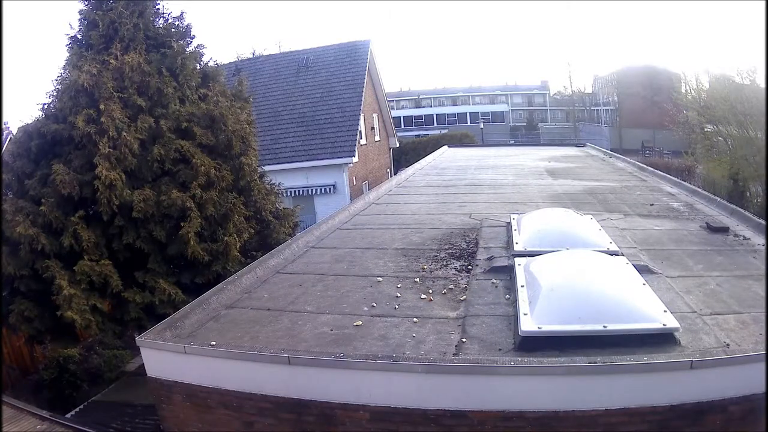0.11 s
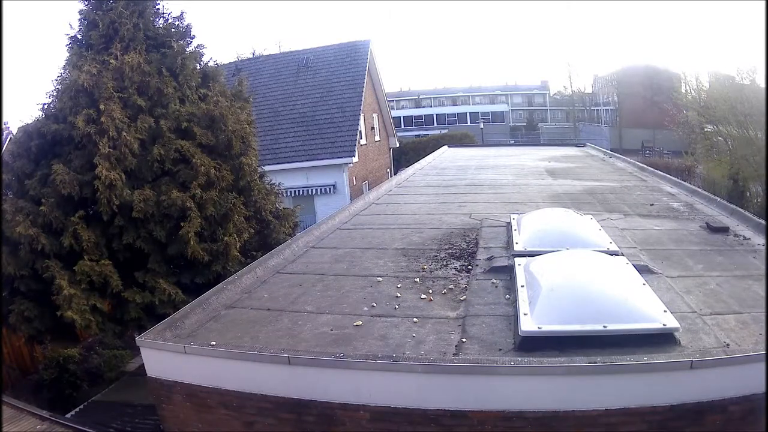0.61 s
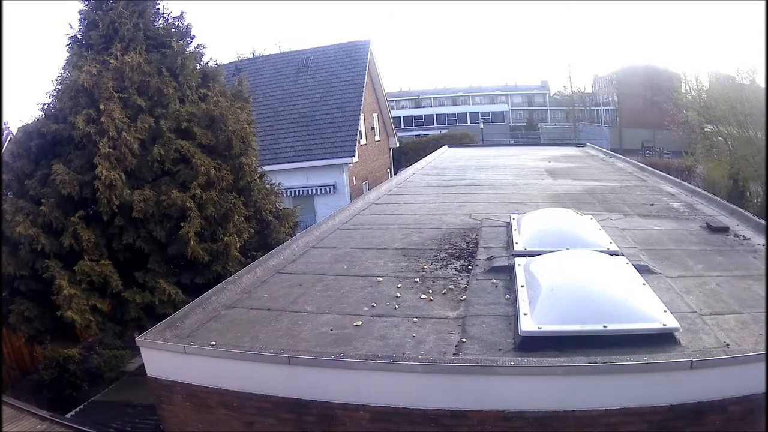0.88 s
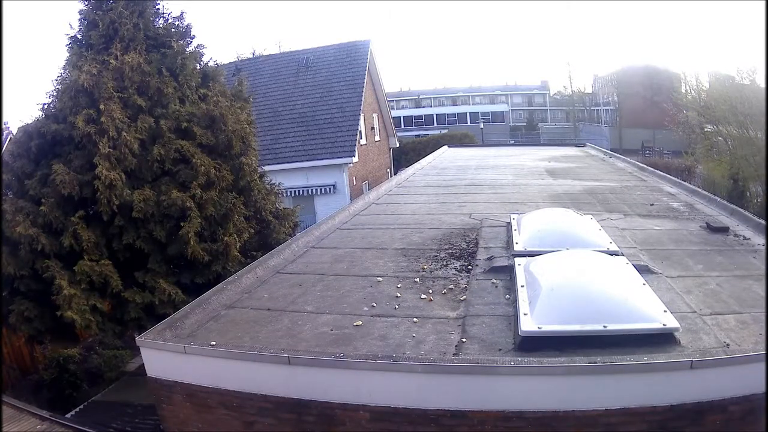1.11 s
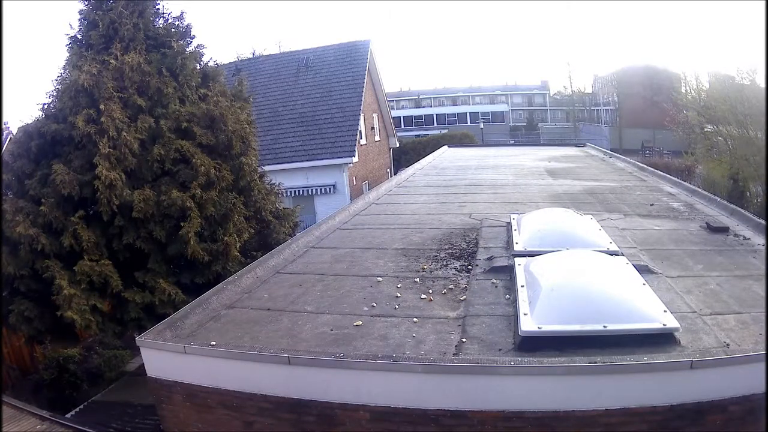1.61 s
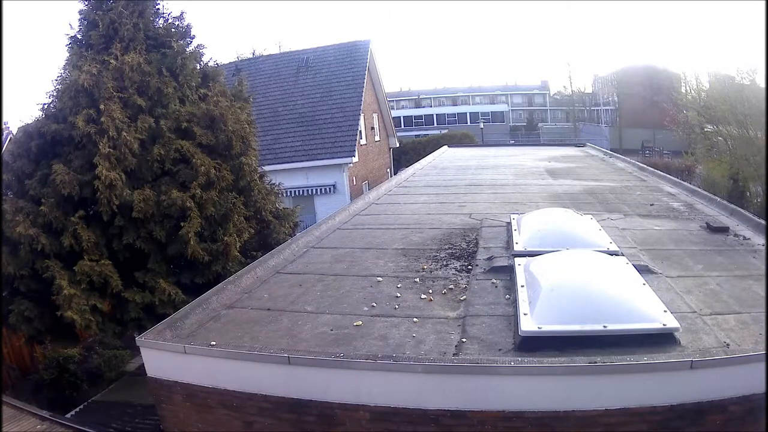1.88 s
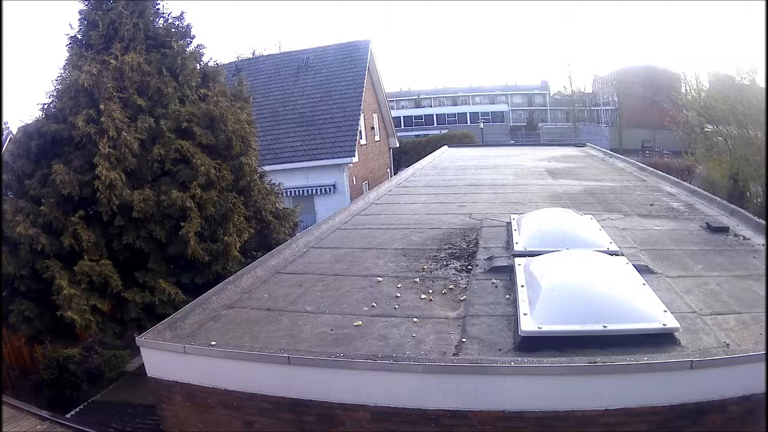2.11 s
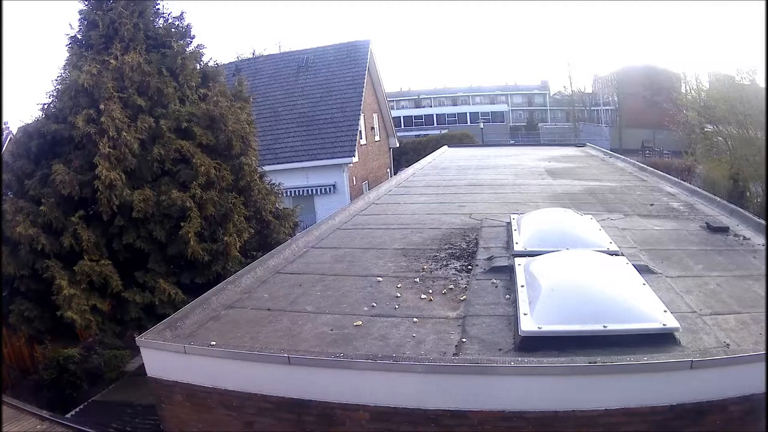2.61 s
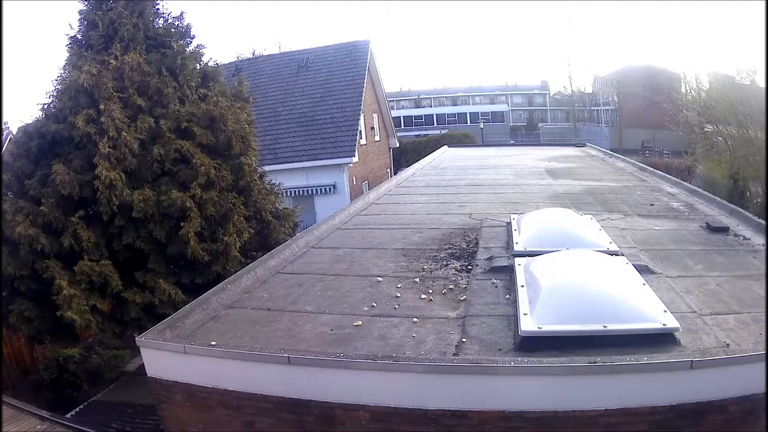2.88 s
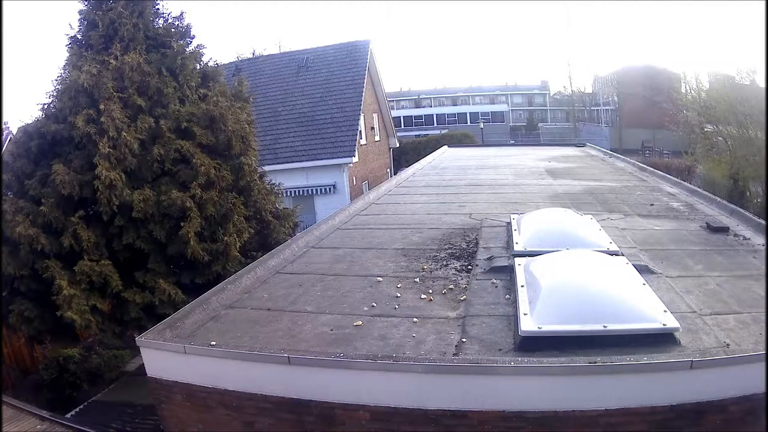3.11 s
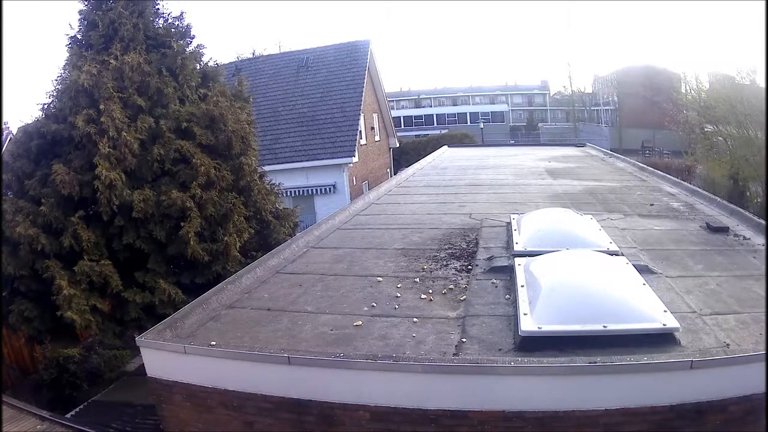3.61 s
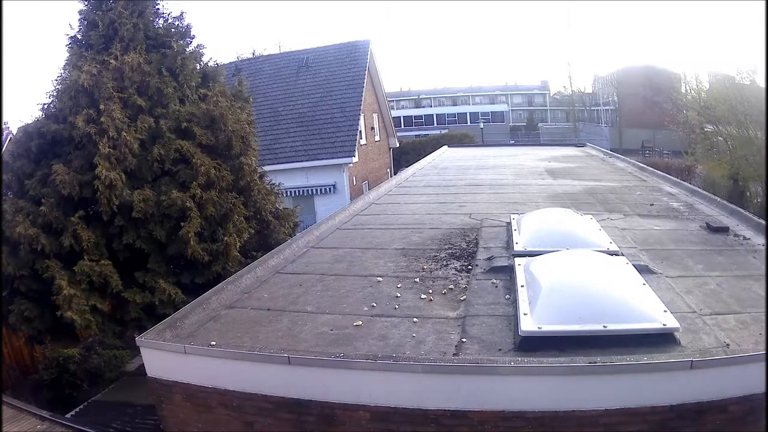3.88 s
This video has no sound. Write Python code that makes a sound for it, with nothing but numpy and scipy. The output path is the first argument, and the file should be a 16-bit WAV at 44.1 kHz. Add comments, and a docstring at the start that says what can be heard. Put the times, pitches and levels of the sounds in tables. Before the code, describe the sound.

A gull gives four quick yelps, then a loud wail that breaks upward, near the end of a low distant traffic rumble; one sharp click comes just before. Open rooftop among houses, dull narrow-band microphone.

```python
"""A flat roof between houses, with a gull calling overhead: four short yelps, then a long wail that breaks upward.
The gull is a stack of wavering harmonics with breath noise; house fronts send it back as dull echoes.
Far-off town traffic is banded noise with engine drones; the background treble thins out just before the calls.
All this ends steeply near 4 kHz and its faint treble drops out; one sharp click, a decaying step with a
short ring, lies on top with its full band."""
import sys
import numpy as np
from scipy import signal
from scipy.io import wavfile
from scipy.ndimage import uniform_filter1d, minimum_filter1d

SR = 44100
rng = np.random.default_rng(int(sys.argv[2]) if len(sys.argv) > 2 else 0)


def master(y):
    """Save y as 16-bit WAV."""
    cut = np.clip(np.atleast_2d(y).T, -1, 1)
    pcm = np.round(cut * 32767)  # scale
    wavfile.write(sys.argv[1], SR, pcm.astype(np.int16))


def attenuation_scalar(level_db):
    """Turn a level in dB into a linear amplitude multiplier (20 dB per decade)."""
    decades = np.asarray(level_db, float) / 20
    return 10 ** decades


N = 176400  # samples, 4 s


def rms_one(x):
    """Scales a signal to rms 1."""
    return x / np.sqrt(np.mean(np.abs(x) ** 2) + 1e-20)


def drift(rate_hz):
    """Slow chance: noise through a double one-pole low-pass at a tenth of the sample rate, spread 1."""
    r = np.exp(-20 * np.pi * rate_hz / SR)
    noise = rng.standard_normal(N // 10 + 8002)
    slow = signal.lfilter([1], [1, -2 * r, r * r], noise)[8000:]  # settled part only
    return np.interp(np.arange(N) / 10, np.arange(len(slow)), rms_one(slow - slow.mean()))


def resonance(x, hz, width_hz):
    """A two-pole resonator: the narrower its width, the longer it rings."""
    r = np.exp(-np.pi * width_hz / SR)
    return signal.lfilter([1, 0, -1], [1, -2 * r * np.cos(2 * np.pi * hz / SR), r * r], x)


def traffic():
    """Far town traffic: fifth-octave bands of noise that swell and wander, with engine drones among them."""
    # swell of the traffic, each column taken about its mean: t/s, deep rumble/dB, engines/dB, tyre roar/dB
    # the mean of the deep rumble also sets the level of the whole noise
    traffic_swell = [(0.0, -35, -29.5, -39.5), (0.218, -31, -29, -37), (.78, -30.5, -27, -34),
                     (1.098, -29.5, -28, -36.5), (1.308, -32, -29, -35.5), (1.589, -28.5, -25.5, -40),
                     (1.899, -27.5, -30, -37), (2.247, -27.5, -33.5, -36.5), (2.685, -27.5, -35, -38.5),
                     (2.695, -27, -29, -33), (2.779, -27.5, -28.5, -31.5), (2.85, -30, -27.5, -33),
                     (2.981, -27.5, -28, -34.5), (3.108, -28, -27.5, -33.5), (3.5, -28, -27.5, -34),
                     (4.0, -29, -30.5, -34.5)]
    # relative spectrum of the noise: f/Hz, density/dB per Hz
    rumble_spectrum = [(13, -42), (24, -5.5), (48, 6), (91, -3.5), (123, 1.5), (190, -3), (269, -7),
                       (425, -12), (700, -14.5), (1150, -17), (1500, -26.5), (1800, -39.5), (1950, -41.5),
                       (2300, -45.5), (2800, -67.5), (3500, -45.5), (4200, -52.5)]
    # far engines: f/Hz, width/Hz, level before swell and wander/dB
    engine_drones = [(61.5, 4.7, -48), (127.6, 3.3, -42), (313.6, 2.8, -44.5), (1010.5, 28, -51),
                     (1663, 110, -55.5)]
    engines_from_hz, roar_from_hz, hiss_from_hz = 95, 550, 1300
    hiss_follows = .35  # the far hiss takes only this share of the roar's swell
    lift_db, drone_wander_db = 4.5, 2

    t = np.arange(N) / SR
    s, rumble_db, engines_db, roar_db = np.transpose(traffic_swell)
    columns = (rumble_db, engines_db, roar_db, hiss_follows * roar_db)
    swells = [np.interp(t, s, column - column.mean()) for column in columns]

    def swell_at(hz):
        """Swell in dB of the part of the traffic that holds this frequency."""
        return swells[np.searchsorted([engines_from_hz, roar_from_hz, hiss_from_hz], hz)]

    together = drift(1.0)
    white = rng.standard_normal((2, N + SR))  # neighbouring bands take different noises
    spectrum_hz, spectrum_db = np.transpose(rumble_spectrum)
    band_edges = 18 * 2 ** (np.arange(41) / 5)
    noise = 0
    for k, (low, high) in enumerate(zip(band_edges, band_edges[1:])):
        band_pass = signal.butter(3, [low, high], "band", fs=SR, output="sos")
        band = signal.sosfilt(band_pass, white[k % 2])[SR:]
        band_db = np.interp(np.log(low * high) / 2, np.log(spectrum_hz), spectrum_db)
        wander_db = .4 * together + 1.0 * drift(2.5) + .7 * drift(12)
        noise = noise + attenuation_scalar(band_db + swell_at(low) + wander_db) * band
    out = attenuation_scalar(lift_db + rumble_db.mean()) * rms_one(noise)

    for hz, width_hz, drone_db in engine_drones:
        drone = rms_one(resonance(rng.standard_normal(N + SR), hz, width_hz)[SR:])
        out += attenuation_scalar(drone_db + swell_at(hz) + drone_wander_db * drift(1.6)) * drone
    return out


def thin_background(x):
    """The background treble above 1850 Hz is cut by 22 dB from about 3.05 s on."""
    t = np.arange(N) / SR
    dull = signal.sosfiltfilt(signal.butter(6, 1850, fs=SR, output="sos"), x)
    return dull + (x - dull) * attenuation_scalar(np.interp(t, [3.04, 3.06], [0, -22]))


def click():
    """One sharp click: a sudden downward step with a brief ring, both dying away exponentially."""
    click_s, step_db, step_t60_s = 2.68995, -13.5, .02
    ring_hz, ring_db, ring_t60_s = 3600, -25, .0025
    t = np.arange(N) / SR - click_s
    step = attenuation_scalar(step_db - 60 * np.abs(t) / step_t60_s)
    ring = attenuation_scalar(ring_db - 60 * np.abs(t) / ring_t60_s) * np.sin(2 * np.pi * ring_hz * t)
    return -(step + ring) * (t >= 0)


def drop_faint_treble(x):
    """Treble far below the loudest treble nearby in time is turned down."""
    above_hz, span_s, under_db, duck_db = 2000, .14, -18, -26
    treble = x - signal.sosfiltfilt(signal.butter(4, above_hz, fs=SR, output="sos"), x)
    level_db = 10 * np.log10(uniform_filter1d(treble ** 2, size=530) + 1e-14)
    loudest_db = -minimum_filter1d(-level_db, size=int(span_s * SR))
    faint = np.clip((under_db - (level_db - loudest_db)) / 4 + .5, 0, 1)  # eases in over 4 dB
    return x - treble * (1 - attenuation_scalar(duck_db * uniform_filter1d(faint, size=220)))


def street(x):
    """House fronts: a few dulled echoes and a dull scattered tail, as one impulse response."""
    # house fronts: delay t/s, level before the last low-pass/dB
    house_fronts = [(.05, -17), (.09, -23), (.24, -18), (.27, -24)]
    scatter_db, scatter_t60_s, scatter_cut_hz = -17, .25, 2600  # level before the last low-pass
    echo_cut_hz = 3000
    t = np.arange(SR // 2) / SR
    reply = rng.standard_normal(len(t)) * attenuation_scalar(-60 * t / scatter_t60_s) * (t > .01)
    reply = signal.sosfilt(signal.butter(1, scatter_cut_hz, fs=SR, output="sos"), reply)
    reply *= attenuation_scalar(scatter_db) / np.sqrt(np.sum(reply ** 2))
    for delay_s, echo_db in house_fronts:
        reply[int(delay_s * SR)] += attenuation_scalar(echo_db)
    reply = signal.sosfilt(signal.butter(2, echo_cut_hz, fs=SR, output="sos"), reply)
    return signal.fftconvolve(x, reply)[:N]


def breath():
    """Air noise in the throat: noise between 1000 and 3470 Hz, rms 1."""
    throat = signal.butter(2, (1000, 3470), "band", fs=SR, output="sos")
    return rms_one(signal.sosfilt(throat, rng.standard_normal(N)))


def voice(pitch_hz, level_db, harmonics, rough, waver, shimmer_db, dull_db=0):
    """Harmonics of one wavering pitch; each shimmers, the high ones most, and carries a halo of breathy noise."""
    # waver is a share of the pitch; rough and shimmer_db hold at the fourth harmonic
    phase = 2 * np.pi * np.cumsum(pitch_hz * (1 + waver * drift(60))) / SR
    out = 0
    for k, db in harmonics:
        halo = uniform_filter1d(drift(150), size=120) + 1j * uniform_filter1d(drift(100), size=120)
        rough_gain = 1 + rough * (k / 4) ** 0.52 * halo
        shimmer = shimmer_db * (k / 4) ** 0.45 * drift(21)
        dulling = dull_db * (k > 3)  # only harmonics above the third grow dull
        turning = np.exp(1j * (k * phase + rng.uniform(0, 2 * np.pi)))
        out = out + attenuation_scalar(db - dulling + shimmer) * np.real(rough_gain * turning)
    return np.sqrt(2) * attenuation_scalar(level_db) * out


def yelps():
    """Four short yelps: pitch, level and brightness rise to each peak and fall back."""
    # yelps: peak t/s, top pitch f/Hz, level at the peak/dB, half length/s
    yelp_peaks = [(3.132, 415.2, -29, 0.033), (3.258, 403.2, -28.5, .026), (3.396, 398, -26.5, .028),
                  (3.554, 385, -26.5, 0.032)]
    # timbre of a yelp: harmonic number, level/dB
    yelp_timbre = [(1, -19), (2, -17), (3, 0), (4, -8), (5, -7), (6, -11), (7, -10), (8, -17), (9, -19)]
    rise, sag = .09, .2  # share by which the pitch lies under its top half a length before, after the peak
    edge_db, dull_db = 8.5, 12  # loss half a length off the peak: whole voice, high harmonics besides
    breath_db = -11.5  # against the level of the yelp
    t = np.arange(N) / SR
    s, top_hz, peak_db, half_s = np.transpose(yelp_peaks)
    k = np.argmin(np.abs(t - s[:, None]), axis=0)  # nearest yelp
    off_peak = np.minimum(((t - s[k]) / half_s[k]) ** 2, 12)
    bend = np.where(t < s[k], rise, sag)
    pitch_hz = top_hz[k] * (1 - bend * np.minimum(off_peak, 2) ** 1.3)
    level_db = peak_db[k] - edge_db * off_peak
    tone = voice(pitch_hz, level_db, yelp_timbre, rough=.36, waver=.008, shimmer_db=3.0,
                 dull_db=dull_db * off_peak)
    return tone + attenuation_scalar(level_db + breath_db) * breath()


def wail():
    """One long note that breaks from the low register to the high one; the two overlap briefly."""
    # track of each register: t/s, pitch f/Hz, level/dB
    low_track = [(3.572, 332, -44.5), (3.582, 346, -33), (3.594, 368, -26), (3.612, 393, -17),
                 (3.632, 393.3, -15.5), (3.66, 384.2, -16), (3.682, 378, -15.5), (3.71, 372, -18.5),
                 (3.734, 375, -18), (3.741, 378, -30), (3.756, 383, -42), (3.775, 385, -66)]
    high_track = [(3.725, 400, -60), (3.748, 416, -33), (3.775, 429, -33), (3.82, 427, -33),
                  (3.845, 424, -27), (3.875, 421, -27), (3.921, 419, -28), (3.95, 430, -28),
                  (3.975, 444, -27), (4.0, 457, -27)]
    # timbre of each register: harmonic number, level/dB
    low_timbre = [(1, -30.5), (2, -23), (3, -9.5), (4, 0), (5, -17), (6, -31.5), (7, -36.5), (8, -25),
                  (9, -25), (10, -37.5)]
    high_timbre = [(1, -11.5), (2, -4.5), (3, -1), (4, -2), (5, -10), (6, -17), (7, -22.5), (8, -13.5),
                   (9, -15)]
    waver, breath_db = .001, -25  # share of pitch; against the level of the wail
    registers = (  # track, timbre, roughness, shimmer in dB
        (low_track, low_timbre, .08, .8),
        (high_track, high_timbre, .17, 2.4),
    )
    t = np.arange(N) / SR
    out = 0
    for track, timbre, rough, shimmer_db in registers:
        s, hz, db = np.transpose(track)
        pitch_hz = np.interp(t, s, hz)
        level_db = np.interp(t, s, db, left=-120, right=-120)  # silent outside its track
        out = out + voice(pitch_hz, level_db, timbre, rough, waver, shimmer_db)
        out = out + attenuation_scalar(level_db + breath_db) * breath()
    return out


def scene():
    """The gull, its echoes off the house fronts and the far traffic, on one channel."""
    gull = yelps() + wail()
    return (gull + street(gull) + thin_background(traffic()))[None]


def band_limit(x):
    """A steep low-pass at the top of the band."""
    return signal.sosfilt(signal.butter(12, 16500, fs=SR, output="sos"), x)


def record(dry):
    """The band ends steeply near 4 kHz and faint treble drops out; the click enters after that."""
    narrow = signal.sosfilt(signal.cheby2(12, 70, 4400, fs=SR, output="sos"), dry)  # 70 dB down from 4400 Hz
    mix = drop_faint_treble(narrow) + click()
    return band_limit(mix)


dry = scene()
out = record(dry)
master(out)
```